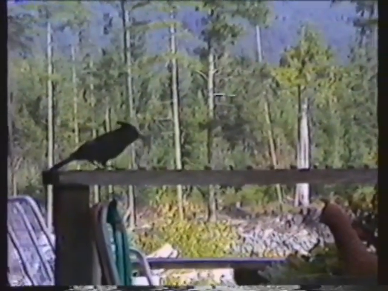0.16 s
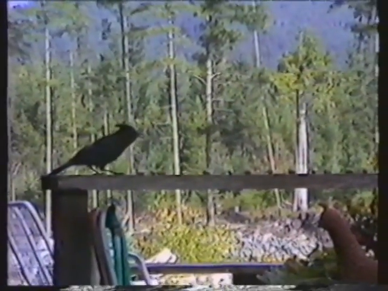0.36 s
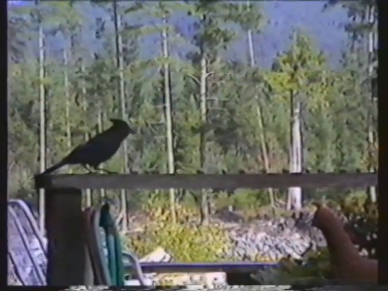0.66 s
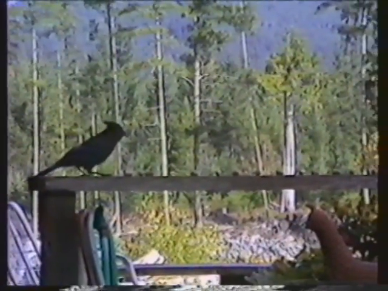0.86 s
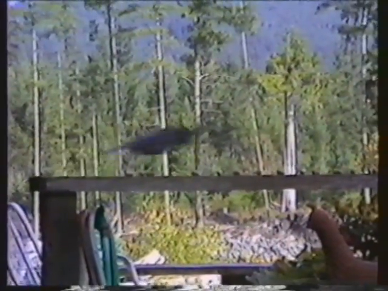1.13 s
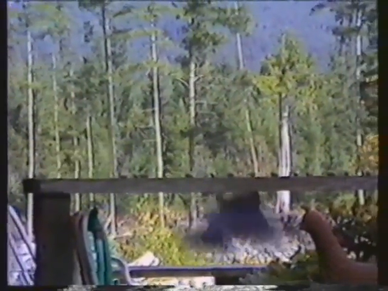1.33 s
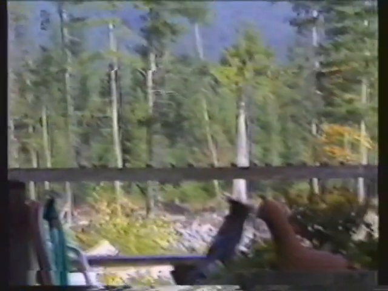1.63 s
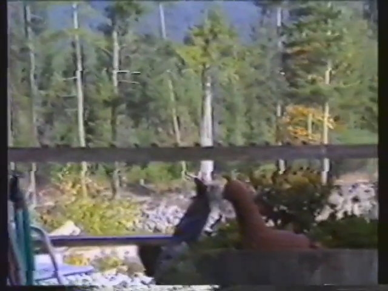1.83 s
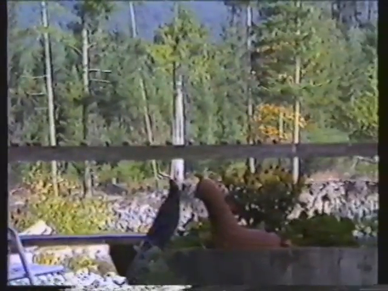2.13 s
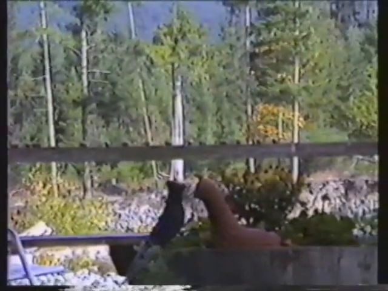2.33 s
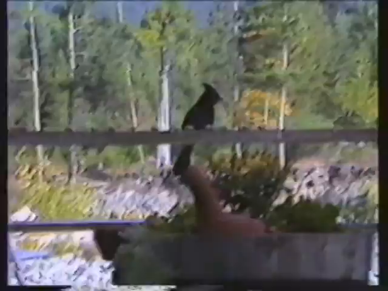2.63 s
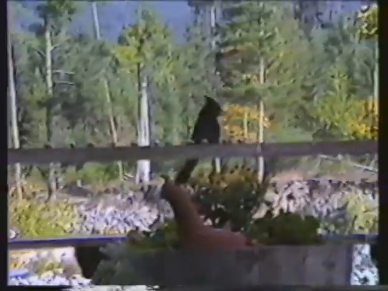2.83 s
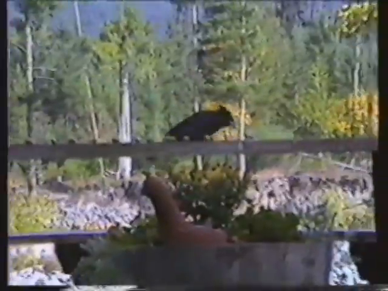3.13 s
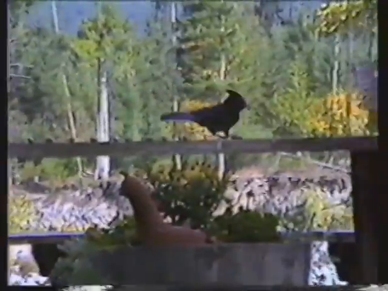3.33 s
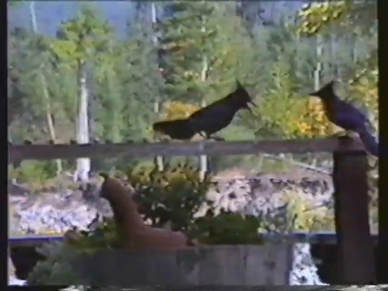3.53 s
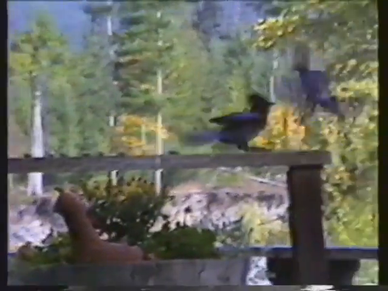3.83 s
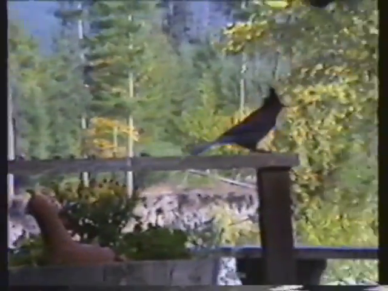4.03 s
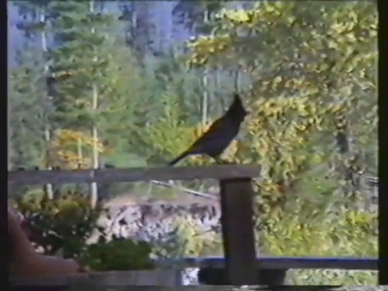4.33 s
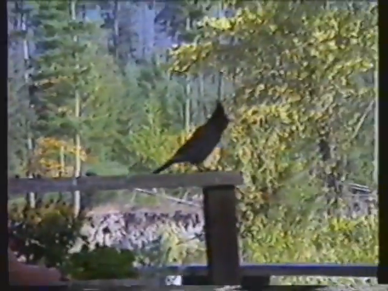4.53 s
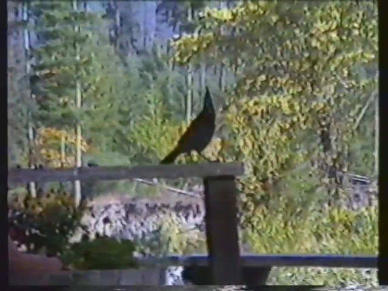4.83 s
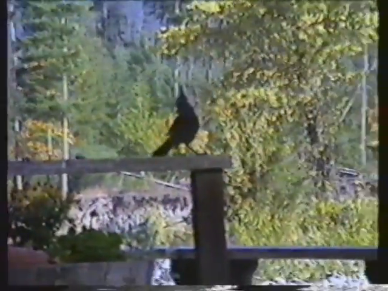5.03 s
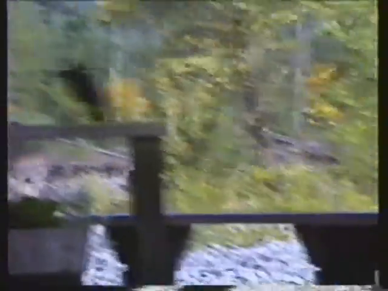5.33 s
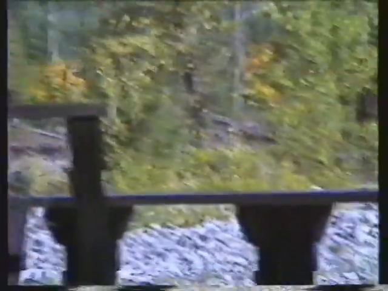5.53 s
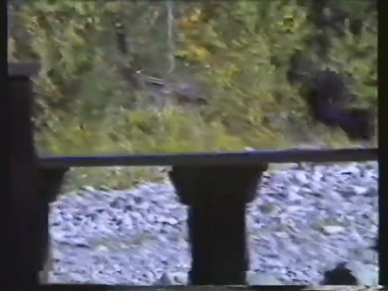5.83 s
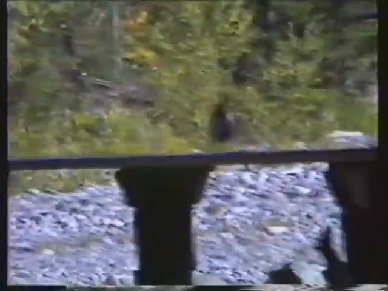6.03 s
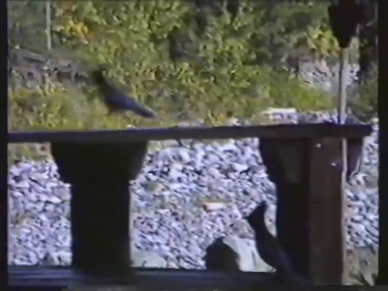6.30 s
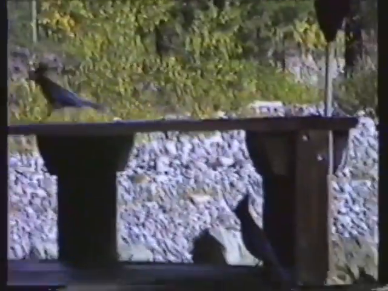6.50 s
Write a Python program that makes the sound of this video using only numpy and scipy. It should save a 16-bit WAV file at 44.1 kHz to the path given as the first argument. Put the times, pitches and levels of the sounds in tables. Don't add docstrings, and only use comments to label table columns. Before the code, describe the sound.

Outdoors by a forest, a few metres from a handheld tape camera, a jay gives one softer harsh call with a second bird's squeaky squawk breaking over it. After a pause comes a fuller rasp with claws ticking on wood, then two louder rasps close together and a bright final tick. Low hum, hiss, thumps and groans from the camera run close in; the sound is only on the right.

```python
import sys
import numpy as np
from scipy import signal
from scipy.io import wavfile
from scipy.ndimage import uniform_filter1d

SR = 44100
rng = np.random.default_rng(int(sys.argv[2]) if len(sys.argv) > 2 else 0)


def store_wav(level_fs):
    pcm = np.round(np.clip(np.atleast_2d(level_fs), -1, 1) * 32767)
    wavfile.write(sys.argv[1], SR, pcm.T.astype(np.int16))


def rack_gain(trim_db):
    fader = np.asarray(trim_db, float)
    return 10 ** (fader / 20)


N = 293926
T = np.arange(N) / SR


def evened(x):
    return x / np.sqrt(np.mean(x ** 2) + 1e-20)


def hissing(length):
    return rng.standard_normal(length)


def read(points, hz):
    f, value = np.transpose(points)
    return np.interp(np.log(hz + 1), np.log(f + 1), value)


def curves(rows, t):
    s, *columns = np.transpose(rows)
    return [np.interp(t, s, c) for c in columns]


def bumps(rows, t):
    return sum(db * np.exp(-((t - s) / half) ** 2) for s, half, db in rows)


def add(mix, s, sound):
    part = mix[round(s * SR):][:len(sound)]
    part += sound[:len(part)]


def sine(hz):
    return np.sqrt(2) * np.sin(2 * np.pi * (np.cumsum(hz) / SR + rng.random()))


def wander(length, hz):
    return evened(signal.lfilter(*signal.butter(2, hz, fs=SR), hissing(length)))


def resonate(x, hz, width):
    turn = np.exp(2j * np.pi * np.cumsum(hz * np.ones(len(x))) / SR)
    r = np.exp(-np.pi * width / SR)
    return 2 * (turn * signal.lfilter([(1 - r) ** 2], [1, -2 * r, r * r], x / turn)).real


def noise(points, patchy_db):
    hz = np.fft.rfftfreq(1024, 1 / SR)
    a, b, patches = rng.standard_normal((N // 256 + 5, 513, 3)).T
    patches = uniform_filter1d(patches, size=10, axis=0)
    patches = evened(uniform_filter1d(patches, size=14, axis=1))
    z = (a + 1j * b) * rack_gain(read(points, hz)[:, None] + patchy_db * patches)
    return evened(signal.istft(z, nperseg=1024, noverlap=768)[1][:N])


# (start [s], length [s], top pitch [Hz], crest [share of length], rasp effort [dB])
CALLS = [
    (1.303, .228, 1193, .66, -40),
    (3.582, .3, 1198, 0.49, -33.5),
    (4.968, .3, 1171, .4, -31),
    (5.549, .322, 1184, 0.5, -32),
]
# (clear tone [dB], octave [dB], onset [s], tiring [dB], tone enters after [s])
WHISTLES = [(-46.5, -58, 0.043, 2.1, 0.061), (-45, -45.5, .03, 2.5, 0.052),
            (-44.5, -44.5, 0.051, 4.5, 0.044), (-47.5, -41, 0.033, 5, 0.042)]
# (frequency [Hz], level [dB])
THROATS = [
    [(760, -25), (1300, -4), (2250, 0), (2440, -8), (2720, -10), (3020, -0.5), (3270, -3), (3610, -1),
     (4670, -9), (5320, -11), (6720, -9), (9000, -30), (11700, -61), (19800, -120)],
    [(760, -43), (1300, -24), (1540, -6.5), (1830, -9), (2330, -11.5), (2610, -10), (2870, -5.5),
     (3120, -7), (3410, -3), (3910, -1), (4520, -8), (4900, -6), (6250, -16), (9000, -36), (11700, -70),
     (19800, -120)],
    [(760, -56), (1300, -21), (1380, -34), (1470, -13.5), (1700, -4.5), (1840, -6), (2030, -14.5),
     (2670, -9), (3170, -5), (3940, -1), (4520, -8), (5540, -9), (7000, -25.5), (9000, -46), (11700, -74),
     (19800, -120)],
    [(760, -46), (1300, -14), (1740, -9), (2130, -6.5), (2310, -1.5), (2610, -20), (2720, -7), (2970, -7.5),
     (3320, -1), (4240, -2.5), (4600, -7.5), (5020, -3), (5580, -8), (9000, -32.5), (11700, -69),
     (19800, -120)],
]
# (centre [Hz], width [Hz], lift [dB])
WINDPIPES = [
    [(1850, 90, 10), (2400, 130, 8), (3100, 80, 2), (3580, 120, 5), (4260, 100, 6), (5150, 160, 7.5),
     (5530, 170, 7), (6700, 200, 2)],
    [(1690, 110, 4.5), (2190, 130, 11), (3010, 94, 2), (3460, 140, 7), (3950, 280, 5.5), (4850, 83, 0),
     (5450, 80, 7), (6100, 82, 7)],
    [(1700, 59, 8.5), (2103, 150, 11.5), (3240, 47, 9.5), (3630, 38, 10.5), (4000, 220, 5), (4950, 100, 6),
     (5430, 68, 8), (6000, 100, 5)],
    [(1710, 74, 10), (2700, 86, 7), (3260, 190, 6), (3700, 54, 9.5), (4230, 210, 4.5), (5120, 160, 4),
     (5490, 59, 9), (6000, 100, 3)],
]
WINDPIPE_DRIFTS = [
    [4, 5, 4, -3, -8, 8, 0, 3],
    [3, -3, -1.5, -9, 2, 5, 1.5, 1.5],
    [5.1, -4, -5, -3, 5, -3, -9, 1.5],
    [1.5, 1.5, -3, 6, -2, -2, 7, 3],
]
SHUT_BEAK_HZ = [4000, 4200, 2480, 3570]
BEAK_OPENS = [30700, 32000, 39700, 25500]
RASP_RATES = [503.4, 487, 499, 482]


def jay(call, whistle, throat, pipes, drifts_db, shut_hz, opens_hz_per_s, rasp_hz):
    start, length = call[:2]
    t = np.arange(start, start + length, 1 / SR) - start
    n = len(t)
    hz, tone_db, octave_db, effort_db = effort(t, *call[1:], *whistle)
    height = hz / hz.max()

    flap_hz = 170
    flap = sine(flap_hz * (1 + 0.08 * wander(n, 30)))
    tone = rack_gain(tone_db + 0.91 * wander(n, 95)) * sine(hz * (1 + 0.023 * wander(n, 150)))
    tone += rack_gain(tone_db - 9.5) * evened(resonate(hissing(n), hz - flap_hz, 170))

    octave = sine(2 * hz * (1 + 0.015 * wander(n, 116)))
    octave += 0.46 * evened(resonate(hissing(n), 2 * hz, 95))
    slack_db = 110 * (1 - height)
    octave = rack_gain(octave_db - 1.5 - slack_db) * evened(octave)

    tension = np.maximum.accumulate(uniform_filter1d(hz, size=3000)) / hz.max()
    tension *= height ** 0.3 * (1 + 0.009 * wander(n, 20))
    slide, rough = 0.4, 0.58
    turns = np.cumsum(rasp_hz * tension ** slide * (1 + 0.02975 * wander(n, 224))) / SR
    beats = sum(np.cos(2 * np.pi * (k * turns + rng.random())) for k in range(2, 19))
    beats *= 1 + 0.23 * flap
    puffs = (0.89 + np.exp(-(turns % 1) / 0.38)) * hissing(n)
    source = (1 - rough) * evened(beats) + rough * evened(puffs)

    f, s, z = signal.stft(source, SR, nperseg=1024, noverlap=896)
    stretched = f[:, None] / np.interp(s, t, tension) ** slide
    colour_db = read(throat, stretched)
    for (centre, width, db), drift_db in zip(pipes, drifts_db):
        flicker = 1 + 0.18 * evened(uniform_filter1d(hissing(len(s)), size=12))
        band_db = db * flicker + drift_db * (s / length - 0.5)
        colour_db = colour_db + band_db * np.exp(-((stretched - centre) / width) ** 2)
    octaves_over = np.log2((f[:, None] + 1) / (shut_hz + opens_hz_per_s * s))
    colour_db -= 30 * np.maximum(octaves_over, 0) ** 0.61
    rasp = signal.istft(z * rack_gain(colour_db), SR, nperseg=1024, noverlap=896)[1][:n]
    rasp /= np.sqrt(uniform_filter1d(rasp ** 2, size=1500) + 1e-12)
    return start, (tone + octave + rack_gain(effort_db) * rasp) * signal.windows.tukey(n, 0.05)


START_SLACK, END_SLACK, FALL_BEND = 0.115, 0.1945, 2.37
ONSET_DB, RELEASE_DB, RELEASE_S = 12.5, 13, 0.027
SWELL_DB, TONE_TIRES_DB = 8, 5
TONE_LATE_DB_PER_S = 500
OCTAVE_ENTERS_S, OCTAVE_LATE_DB_PER_S = 0.079, 380
OCTAVE_HOLDS_S, OCTAVE_FADES_DB_PER_S, OCTAVE_REST_DB = 0.042, 210, 12


def effort(t, length, top_hz, crest, effort_db, tone_db, octave_db, onset_s, tire_db, enters_s):
    before = np.maximum(1 - t / (crest * length), 0)
    after = np.maximum(t / length - crest, 0) / (1 - crest)
    release_db = RELEASE_DB * np.maximum(1 - (length - t) / RELEASE_S, 0)
    hz = top_hz * (1 - START_SLACK * before ** 2 - END_SLACK * after ** FALL_BEND)

    tone_db = tone_db - TONE_LATE_DB_PER_S * np.maximum(enters_s - t, 0)
    tone_db -= TONE_TIRES_DB * after ** 2 + release_db / 2

    octave_db = octave_db - OCTAVE_LATE_DB_PER_S * np.maximum(OCTAVE_ENTERS_S - t, 0) - release_db
    past_hold = np.maximum(t - crest * length - OCTAVE_HOLDS_S, 0)
    octave_db -= np.minimum(OCTAVE_FADES_DB_PER_S * past_hold, OCTAVE_REST_DB)

    effort_db = effort_db - ONSET_DB * np.exp(-t / onset_s)
    effort_db -= SWELL_DB * before ** 2 + tire_db * after + release_db
    return hz, tone_db, octave_db, effort_db


# (start [s], length [s], upper band [dB], lower band [dB], fill [dB])
SQUAWK_NOTES = [
    (1.452, 0.064, -48, -46, -51),
    (1.499, 0.035, -40, -53, -49),
    (1.526, 0.066, -39.5, -49, -47.5),
]
SQUAWK_FROM_HZ, SQUAWK_TO_HZ, SQUAWK_LOW_HZ = 3450, 4060, 1895
SQUAWK_TURN_S, SQUAWK_GLIDE_S, SQUAWK_EDGE_S = 1.513, 0.013, 0.008


def squawk(start, length, high_db, low_db, fill_db):
    t = np.arange(0, length + SQUAWK_EDGE_S, 1 / SR)
    glide = 1 / (1 + np.exp((SQUAWK_TURN_S - start - t) / SQUAWK_GLIDE_S))
    high_hz = SQUAWK_FROM_HZ + (SQUAWK_TO_HZ - SQUAWK_FROM_HZ) * glide
    low_hz = SQUAWK_LOW_HZ * (high_hz / SQUAWK_FROM_HZ) ** 0.28
    sagging_db = high_db - 4 * t / length
    high = rack_gain(sagging_db) * evened(resonate(hissing(len(t)), high_hz, 340))
    low = rack_gain(low_db) * evened(resonate(hissing(len(t)), low_hz, 220))
    fill = rack_gain(fill_db) * evened(resonate(hissing(len(t)), 3330, 2200))
    edges = np.clip(np.minimum(t, t[-1] - t) / (2 * SQUAWK_EDGE_S), 0, 1) ** 2
    return start, edges * (high + low + fill)


# (time [s], peak [dB], centre [Hz], t60 [s])
CLAW_TICKS = [
    (3.457, -43, 2050, 0.03),
    (3.595, -31.5, 3900, 0.034),
    (4.4077, -39.5, 3640, 0.034),
    (6.085, -27.5, 4870, 0.021),
]
# (frequency [Hz], level [dB], t60 [s])
RAIL_MODES = [(1190, -10, 0.0072), (3380, -7, 0.0054), (3950, -5, 0.0067), (4620, -8, 0.0063),
              (5250, -16, .005), (7660, -7, 0.0027)]


def tick(hz, t60):
    t = np.arange(1500) / SR
    scrape = hissing(1500) * rack_gain(-60 * t / t60)
    scrape[0] = 4.7
    swell = 1 - np.exp(-t / 0.0012)
    ring = np.zeros(1500)
    for f, db, decay in RAIL_MODES + [(hz, 0, 0.005)]:
        ring += rack_gain(db - 60 * t / decay) * swell * np.sin(2 * np.pi * f * t)
    out = signal.fftconvolve(scrape, ring)[:1500]
    return out / abs(out).max()


def trees(x, t60=0.35):
    taps = np.zeros(SR // 2)
    at = np.arange(400, SR // 2 - 20, 20)
    taps[at + rng.integers(0, 20, len(at))] = rng.choice([-1., 1.], len(at))
    taps *= rack_gain(-60 * np.arange(SR // 2) / SR / t60)
    return signal.oaconvolve(x, taps / np.linalg.norm(taps))[:N]


# (time [s], peak [dB], ring [Hz], length [s])
HAND_THUMPS = [(2.335, -56, 153, 0.061), (2.776, -46, 148, 0.065), (3.169, -41, 160, 0.07),
               (3.28, -44.5, 156.5, 0.099), (3.424, -46.5, 145, 0.12), (3.89, -42, 131, 0.053),
               (4.288, -31, 139, 0.088), (4.904, -41.5, 133.3, 0.076), (5.809, -46, 144.4, 0.054),
               (5.983, -43, 144, 0.093)]


def thump(hz, length):
    u = np.arange(round(3 * length * SR)) / (length * SR)
    shape = u * np.exp(-(2.4 * u) ** 2)
    return shape / shape.max() * np.sin(2 * np.pi * hz * length * u)


# (start [s], length [s], pitch [Hz], slide [Hz], level [dB])
GROANS = [
    (3.2, 0.22, 161.4, -13.5, -53),
    (3.44, .14, 104.4, 3, -55),
    (3.59, 0.38, 169.7, 7.5, -55),
    (3.92, 0.38, 112.2, 3, -52),
]


def groan(start, length, hz, slide_hz, db):
    u = np.arange(0, 1, 1 / (length * SR))
    wavering_hz = hz + slide_hz * (u - 0.5) + 3.4 * wander(len(u), 17)
    return start, rack_gain(db) * np.sin(np.pi * u) ** 0.31 * sine(wavering_hz)


# (time [s], level [dB], ring [Hz])
BODY_RING = [(0, -56.5, 136), (3, -54.5, 134.9), (4.4, -56, 132.2), (5.3, -53, 131.5), (6.66, -51.5, 131.3)]
# (time [s], half length [s], lift [dB])
GRIP_CHANGES = [(0, 0.071, 6), (.42, 0.071, -8), (.82, 0.013, -20), (2.42, 0.014, 12.5), (3.19, 0.046, 14),
                (3.38, .05, 1), (3.5, .06, 7), (4.33, .035, 8), (4.47, .03, -8), (4.55, 0.033, 7),
                (4.91, 0.031, 0), (5.11, .07, -2), (5.22, .06, 1.5), (5.86, 0.065, 9), (6.27, 0.11, -4),
                (6.6, .06, 4.5)]


def body_ring():
    db, hz = curves(BODY_RING, T)
    ring = 0.64 * sine(hz + 2.642 * wander(N, 7.8)) + evened(resonate(hissing(N), hz, 23))
    return rack_gain(db + bumps(GRIP_CHANGES, T)) * evened(ring)


# (time [s], half length [s], lift [dB])
MOTOR_DRAG = [(.24, 0.19, -27), (2.27, .1, -9), (2.61, 0.1, -16), (3.7, 0.85, 4.5), (4.04, .07, -6),
              (4.28, 0.09, 0.5), (4.67, 0.17, -5), (5.05, .22, -8.5), (5.55, 0.24, 3.5), (6.47, .11, -16)]


def motor_hum():
    motor = rack_gain(-57 + bumps(MOTOR_DRAG, T)) * sine(178.3 + 0.78 * wander(N, 2.7))
    return motor + rack_gain(-73.5) * sine(np.full(N, 60.6))


DRUM_HZ = 29.99
# (frequency [Hz], level [dB rms])
STRAY_BUZZ = [(8425, -87), (9868, -88), (11305, -89), (11456, -91), (11725, -90), (11784, -89),
              (13227, -91), (14847, -95)]
DRUM_ORDERS = [29, 30, 31, 33, 37, 41, 42, 43, 45, 48, 49, 51, 54, 57, 60]


def head_buzz():
    flutter = 1 + 0.0003 * wander(N, 4)
    orders = [(8 * k * DRUM_HZ, -86 - 0.16 * (k - DRUM_ORDERS[0])) for k in DRUM_ORDERS]
    return rack_gain(0.5) * sum(rack_gain(db) * sine(hz * flutter) for hz, db in STRAY_BUZZ + orders)


def zoom_motor():
    return rack_gain(-77) * evened(resonate(hissing(N), 10700, 150)) * np.clip(T - 1.3, 0.2, 1)


# (time [s], frequency [Hz])
SCAN_WHINE = [(0, 15737), (1.5, 15737.6), (3.75, 15738), (4.05, 15722), (4.7, 15690), (6.66, 15684)]


def scan_whine():
    turn = 2 * np.pi * DRUM_HZ * T
    pulse = 1 + 0.6 * np.cos(turn) + 0.3 * np.cos(2 * turn)
    return rack_gain(-75) * sine(curves(SCAN_WHINE, T)[0] + 1.2 * wander(N, 3)) * pulse


# (frequency [Hz], level [dB per Hz])
TAPE_HISS = [(20, -34), (35, -24), (60, -14), (100, -18), (300, -5.5), (2000, 2.5), (2700, -6), (3400, 1.5),
             (4500, 3.5), (7000, -4.5), (10000, -5), (14000, -9.5), (15000, -7), (15800, -7)]


def tape_hiss():
    return rack_gain(-58.5) * noise(TAPE_HISS, patchy_db=0.64)


# (frequency [Hz], level [dB per Hz])
DISTANT_WASH = [(120, -12.5), (210, 0.5), (257, -6), (301, 0), (333, -1.5), (469, -3), (534, -0.5),
                (722, -4), (810, -2.5), (1100, -6.5), (1320, -9), (2380, -25.5), (4290, -24.5),
                (6500, -38.5), (8450, -37), (14300, -120)]
# (time [s], half length [s], lift [dB])
WASH_GUSTS = [
    (1.7, 1, 2),
    (4.0, 0.12, 0.9),
    (5.85, 0.09, -2),
    (6.55, .15, 0),
]


def distant_wash():
    return rack_gain(-48.5 + bumps(WASH_GUSTS, T)) * noise(DISTANT_WASH, patchy_db=0.83)


# (frequency [Hz], level [dB per Hz])
UNFED_NOISE = [(20, -19), (300, -70), (1200, 17), (5000, 16), (9000, 11.5), (16000, 8)]
# (frequency [Hz], level [dB rms])
UNFED_TONES = [(720, -96), (1440, -101), (2879, -106), (3599, -108)]


def unfed_track():
    tones = sum(rack_gain(db) * sine(np.full(N, hz)) for hz, db in UNFED_TONES)
    return rack_gain(-79) * noise(UNFED_NOISE, patchy_db=-1.5) + tones


def scene():
    rail, close = np.zeros(N), np.zeros(N)
    for call in zip(CALLS, WHISTLES, THROATS, WINDPIPES, WINDPIPE_DRIFTS,
                    SHUT_BEAK_HZ, BEAK_OPENS, RASP_RATES):
        add(rail, *jay(*call))
    for note in SQUAWK_NOTES:
        add(rail, *squawk(*note))
    for s, db, hz, t60 in CLAW_TICKS:
        add(rail, s - 0.001, rack_gain(db) * tick(hz, t60))
    for s, db, hz, length in HAND_THUMPS:
        add(close, s - 0.012, rack_gain(db) * thump(hz, length))
    for moan in GROANS:
        add(close, *groan(*moan))
    camera = body_ring() + motor_hum() + head_buzz() + zoom_motor() + scan_whine() + tape_hiss()
    right = 2 * (rail + rack_gain(-15) * trees(rail) + close + camera + distant_wash())
    bass_cut = signal.butter(2, 48, "high", fs=SR, output="sos")
    right = signal.sosfilt(bass_cut, right)
    right = 0.3 * np.tanh(right / 0.3)
    return np.array([unfed_track(), right])


def roll_off(x):
    return signal.sosfilt(signal.butter(12, 15760, fs=SR, output="sos"), x)


def record(dry):
    return roll_off(dry)


dry = scene()
out = record(dry)
store_wav(out)
```